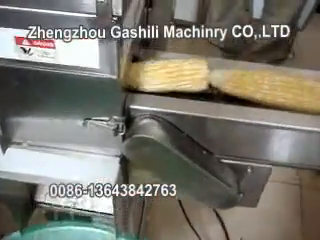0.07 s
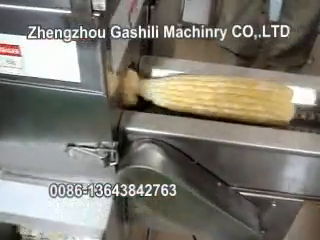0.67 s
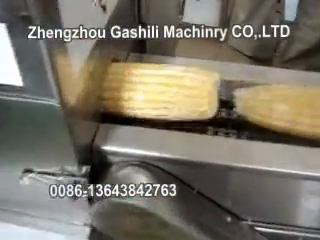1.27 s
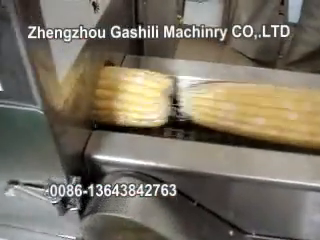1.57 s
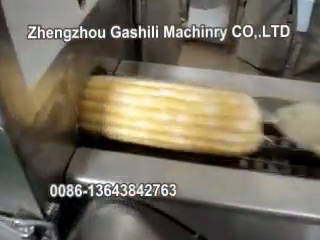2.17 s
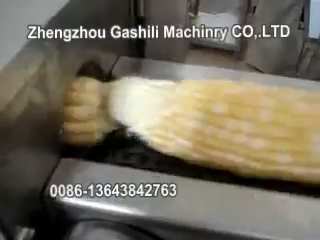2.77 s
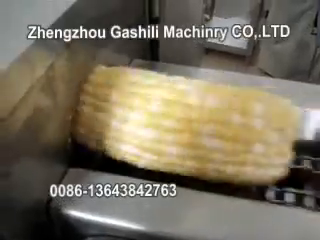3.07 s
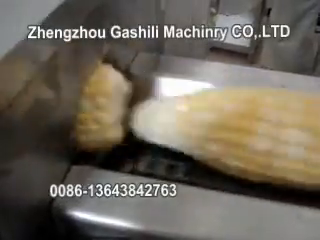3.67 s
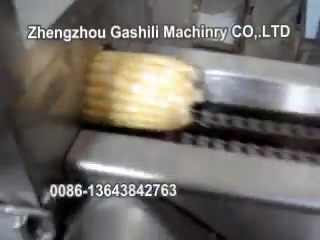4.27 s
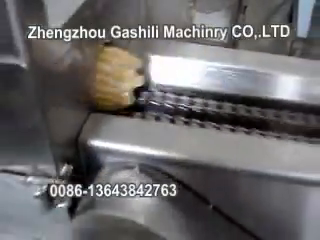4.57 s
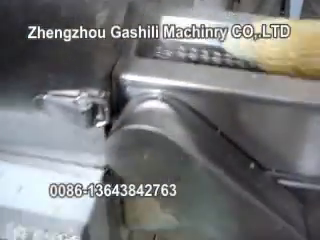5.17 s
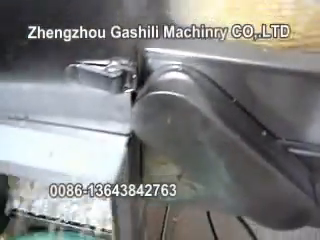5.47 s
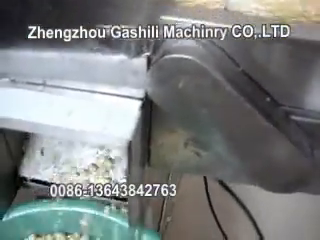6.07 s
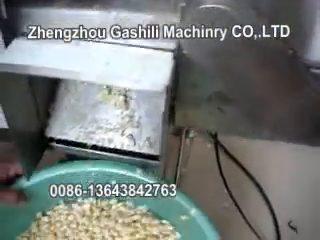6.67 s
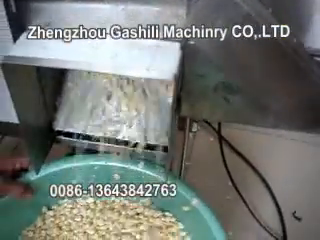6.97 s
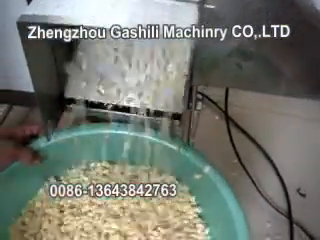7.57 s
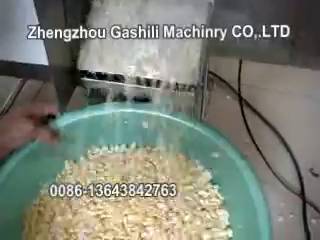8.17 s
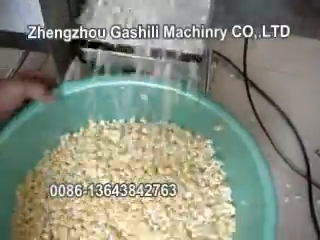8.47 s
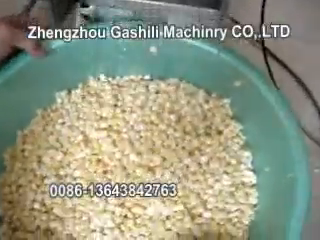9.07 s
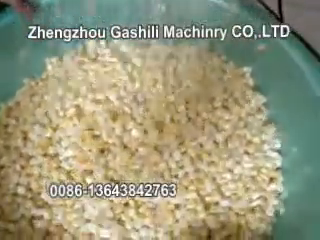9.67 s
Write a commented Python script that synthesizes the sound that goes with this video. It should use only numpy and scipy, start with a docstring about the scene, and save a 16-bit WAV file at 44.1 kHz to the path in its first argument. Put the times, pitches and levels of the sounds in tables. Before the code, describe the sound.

An electric corn sheller runs throughout, about ten seconds, heard from a close, moving position in a workshop with little echo. The motor hums with a thin high whine, the cutter head holds a wavering tone, and the chain conveyor rumbles and rattles the steel housing. About once a second a cob passes: knives rasp with a gritty ring, kernels drum on the steel chute, and four sprung rollers clack shut in quick succession. Bare cobs drop out with hollow, ringing thuds, at around 0.1, 1.5, 2.3 and 3.4 seconds and onward until 8.9, the hardest at 6.2. The kernels pour most strongly near 4, 6.6 and 7.6 seconds. Faint high whistles swell and fade from about 1.3 to 3.3 seconds and again from 5.3 to 7.2. Near 8.6 seconds a wet cob gives a few short, shrill squeaks against a roller, and the machine keeps running.

```python
"""An electric corn sheller in a workshop, heard from a close, moving position. From the start the motor hums
and whines, the cutter head sings and the chain conveyor rattles the steel housing. About once a second a cob
passes: knives rasp it and kernels drum on the chute, four sprung rollers clack shut in turn behind its tail,
then the bare cob drops out with a thud. Between 1 and 7 s a faint whistle near 5 kHz comes and goes, and the
cutter head's ninth harmonic near 2.6 kHz swells into a shaky ring; near 8.6 s a wet cob squeaks against a
roller."""
import sys
import numpy as np
from scipy import signal
from scipy.fft import rfft, irfft, next_fast_len
from scipy.io import wavfile
from scipy.ndimage import uniform_filter1d, map_coordinates

SR = 44100
rng = np.random.default_rng(int(sys.argv[2]) if len(sys.argv) > 2 else 0)


def master(y):
    """Save y as 16-bit WAV."""
    cut = np.clip(np.atleast_2d(y).T, -1, 1)
    pcm = np.round(cut * 32767)  # scale
    wavfile.write(sys.argv[1], SR, pcm.astype(np.int16))


N = 433503
TIME_S = np.arange(N) / SR
BITE_S, RELEASE_S = 0.1, 0.045  # knives grip a cob gradually, let go quickly

# cobs in the knives: (time [s], length [s], rasp [dB], knife ring [dB], kernels [dB])
COB_CUTS = [(0.152, 0.66, -30, -27.5, -37), (0.99, 0.4, -31, -35, -30), (1.988, 0.53, -34, -46, -32),
            (2.923, 0.59, -33, -49, -36), (3.885, 0.61, -33, -32, -24.5), (4.88, .45, -34.5, -41, -40),
            (5.707, 0.21, -42, -53, -39), (6.595, 0.63, -30, -32, -20), (7.579, .38, -29, -43, -23.5),
            (9.093, 0.57, -28, -29, -29)]
# bare cobs hitting the outlet: (time [s], level [dB], length [s], hardness above 1 kHz [dB])
COB_DROPS = [(0.123, -12.5, 0.089, -2), (1.456, -11.5, 0.049, 0), (2.313, -10, 0.027, 0),
             (3.351, -8.5, 0.015, -1), (4.301, -15, 0.032, -4), (5.255, -11, 0.057, 3),
             (6.17, -8.5, 0.056, 11), (7.177, -17.5, 0.04, -4), (7.995, -12.5, 0.094, 0),
             (8.901, -14, 0.06, -5)]


def amp(db):
    """Decibels to gain."""
    return 10 ** (np.asarray(db) / 20)


def unit(x):
    """Scale to rms 1."""
    return x / np.sqrt(np.mean(x ** 2) + 1e-20)


def curve(points):
    """A (time, level) table at every sample."""
    return np.interp(TIME_S, *np.transpose(points))


def spectrum_db(points, hz):
    """A (frequency, level) table read on a log-frequency axis."""
    points_hz, db = np.transpose(points)
    return np.interp(np.log(hz + 1), np.log(points_hz), db)


def lift_db(resonances, hz):
    """A bell-shaped lift or dip at each resonance."""
    return sum(db / (1 + ((hz - centre_hz) * 2 / width_hz) ** 2) for centre_hz, width_hz, db in resonances)


def colour(x, db_at):
    """Filter x by the gain db_at(hz)."""
    size = next_fast_len(len(x) + 2048)
    gain = amp(db_at(np.fft.rfftfreq(size, 1 / SR)))
    return irfft(rfft(x, size) * gain, size)[:len(x)]


def drift(rate_hz):
    """Smooth random motion, rms 1."""
    knots = rng.standard_normal(8192)
    coarse = map_coordinates(knots, [TIME_S[::32] * rate_hz], order=3, mode="wrap")
    return unit(coarse)[np.arange(N) // 32]


def add(mix, start_s, sound):
    """Mix a sound in at start_s."""
    part = mix[max(round(start_s * SR), 0):][:len(sound)]
    part += sound[:len(part)]


def swell(start_s, length_s, attack_s, release_s):
    """Envelope: linear rise, hold, exponential decay."""
    t = TIME_S - start_s
    return np.clip(t / attack_s, 0, 1) * np.exp(-np.clip((t - length_s) / release_s, 0, 20))


def cutting(levels_db, slope_db):
    """Gain while the knives are in a cob; changes by slope_db from tip to tail."""
    gain = np.zeros(N)
    for (start_s, length_s, *_), db in zip(COB_CUTS, levels_db):
        progress = np.clip((TIME_S - start_s) / length_s, 0, 1)
        gain += amp(db + slope_db * (progress - .5)) * swell(start_s, length_s, BITE_S, RELEASE_S)
    return gain


def tone(hz, waver_rad, flutter_db):
    """A sine with wavering phase and level."""
    phase = 2 * np.pi * (hz * TIME_S + rng.random()) + waver_rad * drift(9)
    return np.sqrt(2) * np.sin(phase) * amp(flutter_db * drift(7))


def clicks(rate_hz, spread_db):
    """Random impacts, mostly small, a few large."""
    sizes = amp(spread_db * np.minimum(rng.exponential(1, N), 4))
    return sizes * rng.choice([-1, 1], N) * (rng.random(N) < rate_hz / SR)


def grains(rate_hz, spread_db, t60_s):
    """Random impacts, each a noise burst dying among the steel walls."""
    fall = np.exp(-np.log(1e6) / (t60_s * SR))
    energy = signal.lfilter([1], [1, -fall], clicks(rate_hz, spread_db) ** 2 + 1e-12)
    return np.sqrt(energy) * rng.standard_normal(N)


def mottle(x, depth_db, patch_hz, patch_s):
    """Impacts at different spots favour different modes: gain patches in time and frequency."""
    hz, t, spectra = signal.stft(x, SR, nperseg=256, noverlap=192)
    field = rng.standard_normal((256, 4096))
    grid = np.meshgrid(hz / patch_hz, t / patch_s, indexing="ij")
    patches = unit(map_coordinates(field, grid, order=1, mode="wrap"))
    return signal.istft(spectra * amp(depth_db * patches), SR, nperseg=256, noverlap=192)[1][:len(x)]


def ring(x, modes):
    """Sheet steel struck by x; little radiates below the lowest mode."""
    t = np.arange(SR // 2) / SR
    response = sum(amp(db - 60 * t / t60_s) * np.cos(2 * np.pi * hz * t) / np.sqrt(t60_s)
                   for hz, db, t60_s in modes)
    radiation = signal.butter(2, modes[0][0] * .8, "highpass", fs=SR, output="sos")
    return signal.oaconvolve(x, signal.sosfilt(radiation, response))[:len(x)]


def reflections(x, t60_s):
    """Dense echoes from nearby walls, 4 to 200 ms late."""
    t = np.arange(SR // 5) / SR
    taps = rng.standard_normal(len(t)) * (t > .004) * 1e-3 ** (t / t60_s)
    return signal.oaconvolve(x, taps / np.linalg.norm(taps))[:len(x)]


def whistles(waver_rad=1.0):
    """Faint, unsteady high tones that swell and fade: a whistle near 5 kHz, and the cutter head's ninth
    harmonic near 2.6 kHz."""
    events = [(1.25, 0.99, 5000, -40), (1.602, 1.65, 2585, -29), (2.8, 0.51, 5000, -41),
              (5.298, 1.9, 2596, -31), (5.35, .85, 5000, -48)]  # (time [s], length [s], pitch [Hz], level [dB])
    out = np.zeros(N)
    for start_s, length_s, hz, db in events:
        envelope = amp(db) * signal.windows.tukey(round(length_s * SR), .5)
        line = np.sqrt(2) * np.sin(2 * np.pi * hz * TIME_S + waver_rad * drift(90))
        add(out, start_s, envelope * line[:len(envelope)])
    return out


def motor(mains_hz=49.92, switch_hz=7934.8, sideband_hz=115.8, hum_trim_db=-2.0):
    """Magnetic hum and core buzz at even mains multiples; switching whine of the speed controller."""
    hum_orders = [(4, 1), (10, -16)]  # (mains multiple, level [dB])
    hum_levels = [(0, -16), (.4, -19.5), (1.4, -21), (1.62, -24), (2.1, -20), (3.95, -17.5), (4.27, -24),
                  (4.9, -19.5), (5.9, -18.5), (6.25, -20.5), (7.35, -24.5), (7.85, -25), (8.3, -29.5),
                  (8.8, -34.5), (9.3, -26.5), (9.83, -24.5)]  # hum at the moving listener: (time [s], level [dB])
    whine_db = [-54, -48.5, -47.5, -46.5, -48.5]  # sidebands -2 to +2 of the switching tone: (level [dB])
    hum = sum(amp(db) * tone(k * mains_hz, waver_rad=0.079, flutter_db=1.8) for k, db in hum_orders)
    core = amp(-43.5) * tone(2 * mains_hz, waver_rad=0.32, flutter_db=4.5)
    lines_hz = switch_hz + sideband_hz * (np.arange(len(whine_db)) - 2)
    whine = sum(amp(db) * tone(hz, waver_rad=.5, flutter_db=2.5) for hz, db in zip(lines_hz, whine_db))
    return hum * amp(curve(hum_levels) + hum_trim_db) + core + whine


def cutter(pitch_hz=288.7, first_trim_db=1.5, second_trim_db=0.77):
    """The cutter head sings; its lowest two harmonics swell and fade, the rest only flutter."""
    first_levels = [(0.0, -26.5), (4.52, -34), (5.69, -26), (7.64, -22.5), (8.46, -30.5), (8.76, -28),
                    (9.83, -26.5)]  # fundamental: (time [s], level [dB])
    second_levels = [(0.0, -17.5), (0.22, -12.5), (0.38, -26), (1.15, -19.5), (2.82, -19), (4.05, -27),
                     (4.44, -18), (6.43, -23.5), (6.49, -19.5), (7.42, -33), (8.54, -28.5), (8.65, -21),
                     (8.82, -24.5), (9.42, -15.5), (9.53, -20.5), (9.83, -16)]  # octave, favoured by the housing: (time [s], level [dB])
    upper_orders = [(3, -30), (4, -41.5), (6, -42), (9, -41)]  # (harmonic, level [dB])
    first = amp(curve(first_levels) + first_trim_db) * tone(pitch_hz, 0.23, flutter_db=2.2)
    second = amp(curve(second_levels) + second_trim_db) * tone(2 * pitch_hz, 0.13, flutter_db=1.3)
    upper = sum(amp(db) * tone(k * pitch_hz, 0.089, flutter_db=3.7) for k, db in upper_orders)
    return first + second + upper


def housing(split_hz=620, rumble_trim_db=0.18, rattle_db=-18.0, load_db=1.2, unrest_db=0.42):
    """Chain and rollers shake the panels: low rumble, and a brighter rattle that grows under load."""
    drone = [(20, -48), (65, -29.5), (130, -17), (180, -6.5), (320, -2.5), (480, -1.5), (650, -1),
             (950, -3), (1600, -9), (2800, -12), (3600, -19.5), (5200, -24), (7400, -28.5), (9800, -53.5)]  # running machine: (frequency [Hz], density [dB])
    panels = [(222, 27, 5.5), (245.6, 12, -8), (314.3, 27, 8), (352, 23, 4.5), (400.4, 10.8, 9),
              (457, 7.1, -5), (635, 10, 3), (790, 14, 0), (904, 36, 2.5), (1247, 19, 4.5), (1992, 44, 6.5),
              (2502, 78, 5), (2680, 120, 4), (2890, 22, 0.5), (3500, 52, 3), (4920, 61, 10.5)]  # resonances: (frequency [Hz], width [Hz], lift [dB])
    rumble_levels = [(0, -18.3), (2.5, -17.5), (3.7, -16), (4.4, -17.5), (4.85, -20), (5.4, -16.5),
                     (6.45, -17.5), (7.3, -16), (8.1, -16), (8.32, -21), (8.55, -14.8), (9.3, -18),
                     (9.83, -16.5)]  # (time [s], level [dB])

    def steel_db(hz):
        return spectrum_db(drone, hz) + lift_db(panels, hz)

    def low_share(hz):
        return 1 / (1 + (hz / split_hz) ** 4)

    rumble = colour(rng.standard_normal(N), lambda hz: steel_db(hz) + 10 * np.log10(low_share(hz)))
    links = grains(rate_hz=2200, spread_db=2.0, t60_s=0.046)
    links = mottle(links, depth_db=1.5, patch_hz=308, patch_s=.028)
    rattle = colour(links, lambda hz: steel_db(hz) + 10 * np.log10(1 - low_share(hz) + 1e-9))
    load = sum(swell(start_s, length_s, BITE_S, release_s=0.09) for start_s, length_s, *_ in COB_CUTS)
    rattle_gain = amp(rattle_db + load_db * load + unrest_db * drift(12))
    return unit(rumble) * amp(curve(rumble_levels) + rumble_trim_db) + unit(rattle) * rattle_gain


def squeaks(jitter=0.011, octave_db=-15, echo_gain=0.7):
    """A wet cob sticks and slips on a roller: a shaky tone and its octave echo in the housing."""
    events = [(8.505, 0.074, 3390, -28.5), (8.664, 0.038, 3620, -15.5), (8.72, .04, 3586, -20)]  # (time [s], length [s], pitch [Hz], level [dB])
    slip = np.zeros(N)
    warped_s = np.cumsum(1 + jitter * drift(190)) / SR
    shake = amp(2 * drift(130))
    for start_s, length_s, hz, db in events:
        phase = 2 * np.pi * hz * warped_s
        envelope = amp(db) * shake * swell(start_s, length_s, attack_s=0.026, release_s=0.014)
        slip += (np.sin(phase) + amp(octave_db) * np.sin(2 * phase)) * envelope
    return slip + echo_gain * reflections(slip, t60_s=0.66)


def knife_rasp(idle_db=-36, trim_db=3.5):
    """Kernels shear off in tiny snaps, louder along the cob; only scraps between cobs."""
    rasp = [(300, -17), (900, 0.5), (1700, -5), (2600, -4.5), (3700, -2.5), (4150, -1.5), (4520, 3.5),
            (4950, -3.5), (5400, -1.5), (7000, -9.5), (8500, -6.5), (9800, -38)]  # (frequency [Hz], density [dB])
    snaps = grains(rate_hz=790, spread_db=1, t60_s=0.077)
    snaps = mottle(snaps, depth_db=3.5, patch_hz=465, patch_s=.012)
    bite = cutting([cut[2] for cut in COB_CUTS], slope_db=2.0) * amp(trim_db)
    return unit(colour(snaps, lambda hz: spectrum_db(rasp, hz))) * np.hypot(bite, amp(idle_db))


def knife_ring():
    """A cob spreads the sprung knives, which ring in gritty spurts, most at its tip."""
    modes = [(4360, -2, .018), (4510, 1, .022), (4680, -2, .018), (4880, -5, .012)]  # (frequency [Hz], energy [dB], t60 [s])
    contact = cutting([cut[3] for cut in COB_CUTS], slope_db=-5.5)
    return unit(ring(clicks(rate_hz=400, spread_db=0.5), modes)) * contact


def kernels(trickle_db=-38):
    """Kernels drum on the steel chute: a gush per cob over a steady trickle."""
    chute_modes = [(689, 6, 0.15), (784.4, 14, 0.12), (865, -0.5, 0.078), (1130, -4.5, 0.058),
                   (1870, -2.5, 0.032)]  # (frequency [Hz], energy [dB], t60 [s])
    pour = cutting([cut[4] for cut in COB_CUTS], slope_db=-10) + amp(trickle_db)
    return unit(ring(clicks(rate_hz=490, spread_db=7.5), chute_modes)) * pour


def knocks(trim_db=-7, hardness_weight=.7, fade_s=0.036):
    """Woody first touch of a cob on the outlet; hard landings are louder."""
    wood = [(40, -22), (150, -9.5), (450, 3), (1100, -4.5), (1700, -5.5), (2600, -21.5), (6000, -46)]  # (frequency [Hz], density [dB])
    out, t = np.zeros(N), np.arange(SR // 8) / SR
    for start_s, db, _, hard_db in COB_DROPS:
        knock = unit(colour(rng.standard_normal(len(t)), lambda hz: spectrum_db(wood, hz)))
        add(out, start_s, amp(db + trim_db + hardness_weight * hard_db) * knock * np.exp(-t / fade_s))
    return out


def thuds(rise_s=0.0039, wobble_db=2, detune=0.0072, trim_db=2.5):
    """A tumbling bare cob keeps the outlet ringing; then each mode decays."""
    outlet_modes = [(194.2, -2.5, 0.31), (250, 0.5, 0.55), (303, 0.5, 0.19), (324, -29.5, .15),
                    (386, -1, 0.27), (426.5, -11.5, 0.087), (431, 0, 0.57), (720, -6.5, 0.18),
                    (882, -8, 0.053), (1060, -12, 0.089), (1203, -15, .05), (1546, -15.5, .12)]  # (frequency [Hz], level [dB], t60 [s])
    out, t = np.zeros(N), np.arange(SR // 2) / SR
    tumble = drift(45)
    for start_s, db, length_s, hard_db in COB_DROPS:
        sound = np.zeros(len(t))
        for hz, mode_db, t60_s in outlet_modes:
            hard_share = np.clip(hz / 500 - 1, 0, 1)
            bumps = tumble[rng.integers(N - len(t)):][:len(t)]
            decay_db = 60 * np.maximum(t - length_s, 0) / t60_s
            envelope = amp(mode_db + hard_share * hard_db + wobble_db * bumps - decay_db)
            sound += envelope * np.sin(2 * np.pi * (hz * rng.normal(1, detune) * t + rng.random()))
        sound *= np.minimum(t / rise_s, 1)
        add(out, start_s, amp(db + trim_db) * sound * np.sqrt(length_s * SR) / np.linalg.norm(sound))
    return out


def clack(crackle, length_s, mid_db, top_db, ringing, rise_s=0.00051, fade_s=0.016, tail_t60_s=0.7):
    """A roller springs shut: snap, short chatter, ringing tail."""
    crack = [(300, -11.5), (1200, -2.5), (1900, 2.5), (3000, -1.5), (4200, -4), (5500, -4.5), (7500, -14.5),
             (8800, -12.5), (9800, -25.5)]  # (frequency [Hz], density [dB])
    resonances = [(2600, 280, 6.5), (3560, 240, 13), (4850, 250, 4), (5720, 300, 10), (6350, 200, 5)]  # steel roller: (frequency [Hz], width [Hz], lift [dB])
    t = np.arange(SR // 5) / SR
    after_s = np.maximum(t - length_s, 0)
    snap = 0.55 * np.exp(-t / 0.0084)
    chatter = np.exp(-after_s / fade_s)
    tail = amp(-18 - 60 * after_s / tail_t60_s)
    envelope = np.minimum(t / rise_s, 1) * (snap + chatter + tail)
    burst = crackle[rng.integers(N - len(t)):][:len(t)] * envelope
    tilt = [(2000, mid_db), (4200, 0), (8000, top_db)]
    sound = colour(burst, lambda hz: spectrum_db(crack, hz) + spectrum_db(tilt, hz)
                   + ringing * lift_db(resonances, hz))
    return sound * np.sqrt(length_s * SR) / np.linalg.norm(sound)


def rollers(pull_chatter_s=.028, trim_db=1.0):
    """Behind each cob two feed rollers snap shut in turn, then two pull-out rollers."""
    # cob tails: (time [s], feed level [dB], feed chatter [s], travel [s], pull-out level [dB])
    tails = [(.718, -13, 0.019, .37, -21.5), (1.542, -15.5, .016, .381, -14.5),
             (2.573, -16.5, 0.02, .386, -17.5), (3.544, -13.5, 0.019, .406, -17),
             (4.524, -16.5, .012, .371, -19), (5.381, -15, 0.01, .39, -18.5), (6.433, -27, .008, 0.36, -26),
             (7.243, -14, 0.011, .382, -17.5), (8.163, -14.5, 0.022, .39, -18.5),
             (9.72, -13, 0.019, .39, -18)]
    # roller pairs: (delay [s], level change [dB], mids [dB], top [dB], ringing [factor])
    feed_pair = [(0, -3, -4, -2, 0.9), (.133, 0, -2, 3.5, 0.34)]
    pull_pair = [(0, -1, 2.5, -1.3, 0.69), (.195, 0.35, 3, 1, 0.63)]
    out = np.zeros(N)
    crackle = grains(rate_hz=2500, spread_db=1.0, t60_s=0.027)
    crackle = mottle(crackle, depth_db=2.5, patch_hz=407, patch_s=.012)
    for exit_s, feed_db, feed_chatter_s, travel_s, pull_db in tails:
        stages = [(feed_pair, exit_s, feed_db, feed_chatter_s),
                  (pull_pair, exit_s + travel_s, pull_db, pull_chatter_s)]
        for pair, start_s, db, length_s in stages:
            for delay_s, change_db, *timbre in pair:
                add(out, start_s + delay_s, amp(db + change_db) * clack(crackle, length_s, *timbre))
    return out * amp(trim_db)


def scene():
    """Machine and corn, nearly mono; faint workshop reflections give the width."""
    width = [(60, -7), (200, -27.5), (700, -23.5), (1400, -18.5), (3000, -20), (6000, -14.5), (9000, -15)]  # (frequency [Hz], side minus mid [dB])
    machine = motor() + cutter() + housing() + whistles()
    corn = knife_rasp() + knife_ring() + kernels() + rollers() + knocks() + thuds() + squeaks()
    mid = machine + corn
    side = colour(reflections(mid, t60_s=0.081), lambda hz: spectrum_db(width, hz))
    return np.array([mid + side, mid - side]) * amp([[-.15], [.15]])


def record(dry, threshold_db=-9.5, squeeze=0.92, recovery_db_per_s=22, edge_hz=9800):
    """Gain control ducks the mix at loud knocks; then soft clip and low-pass."""
    power_db = 10 * np.log10(abs(uniform_filter1d((dry ** 2).mean(0), size=900)) + 1e-12)
    recovery_db = TIME_S * recovery_db_per_s
    held_db = np.maximum.accumulate(power_db + recovery_db) - recovery_db
    over_db = np.maximum(held_db - threshold_db, 0)
    ducked = dry / amp(squeeze * uniform_filter1d(over_db, size=200))
    rounded = ducked / (1 + (ducked / .95) ** 8) ** (1 / 8)
    lowpass = signal.firwin(511, edge_hz, window=("kaiser", 9), fs=SR)
    return signal.oaconvolve(rounded, lowpass[None], "same")


dry = scene()
out = record(dry)
master(out)
```